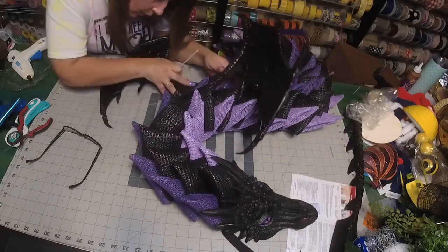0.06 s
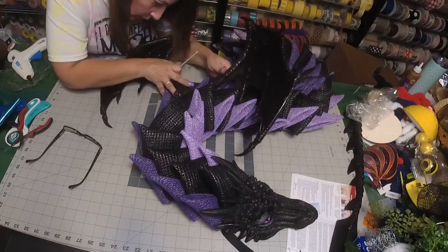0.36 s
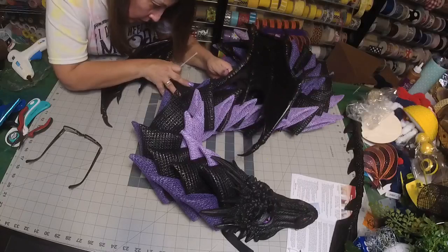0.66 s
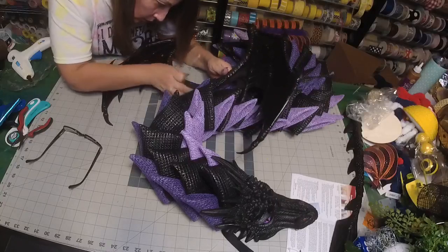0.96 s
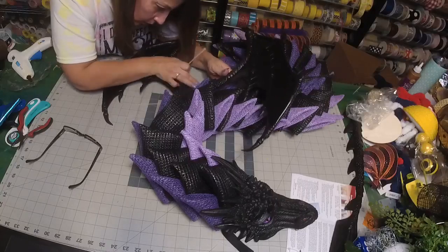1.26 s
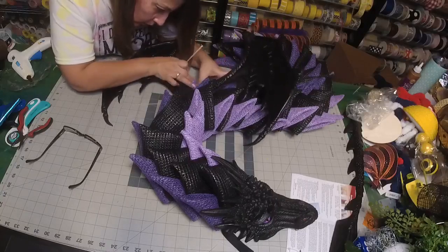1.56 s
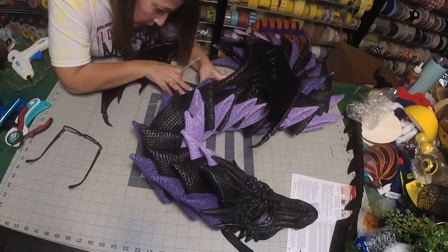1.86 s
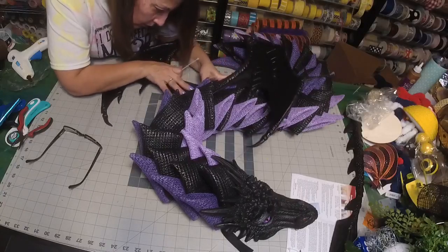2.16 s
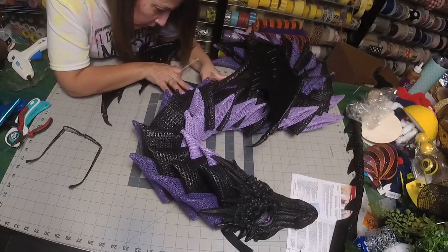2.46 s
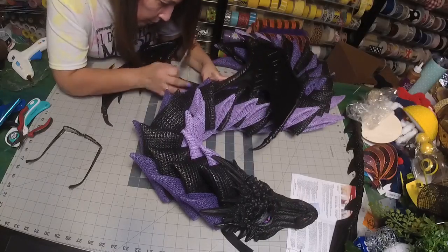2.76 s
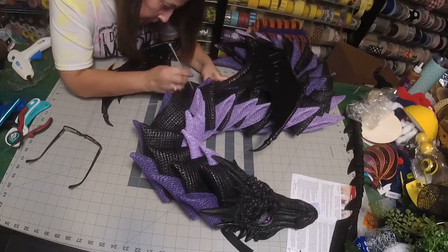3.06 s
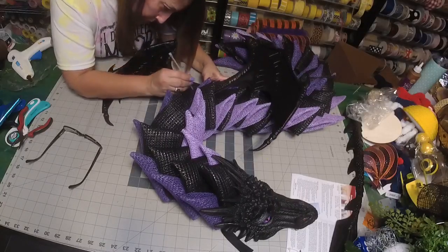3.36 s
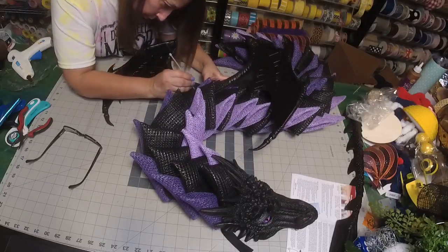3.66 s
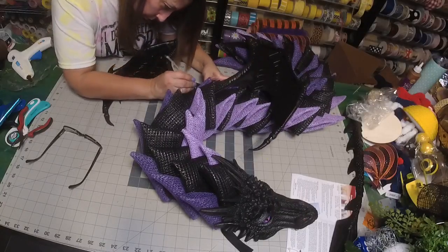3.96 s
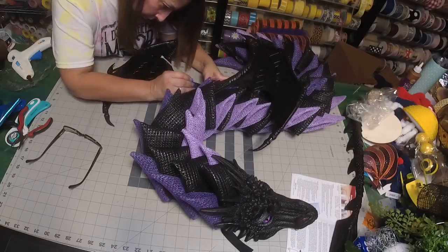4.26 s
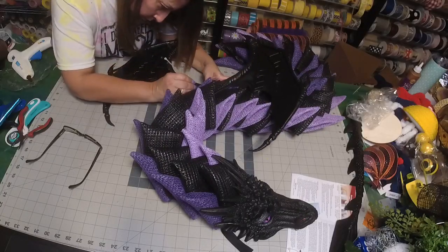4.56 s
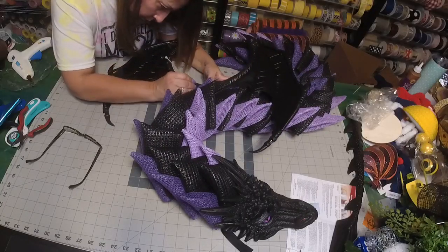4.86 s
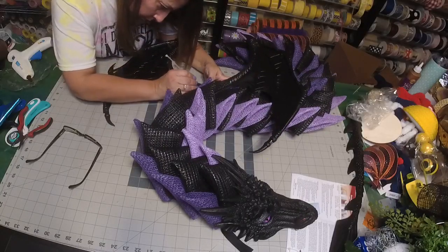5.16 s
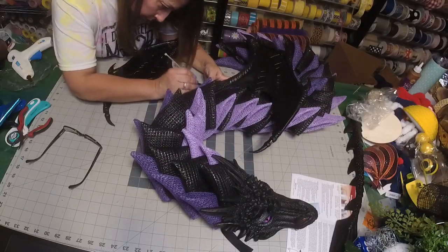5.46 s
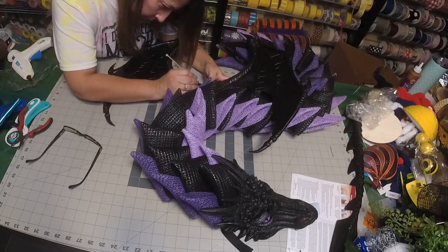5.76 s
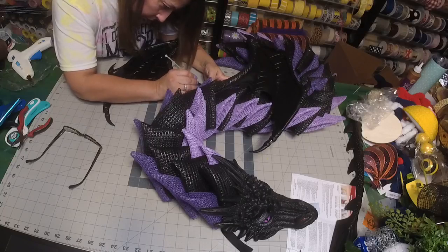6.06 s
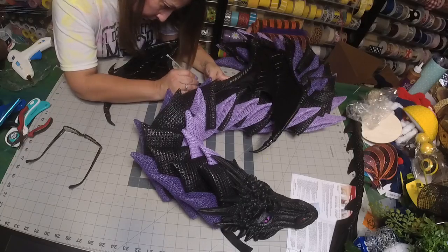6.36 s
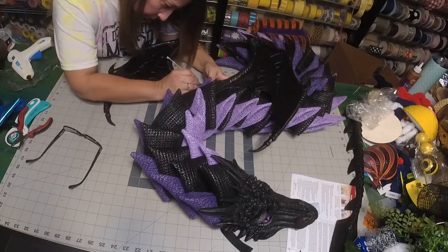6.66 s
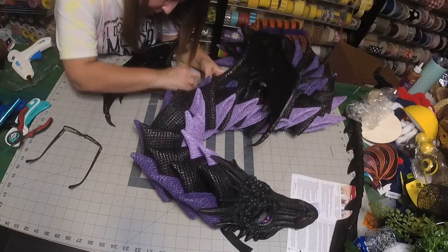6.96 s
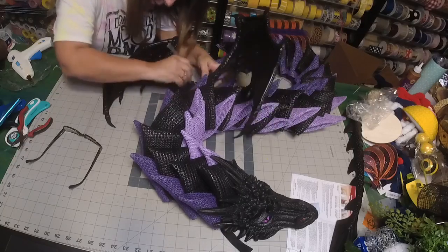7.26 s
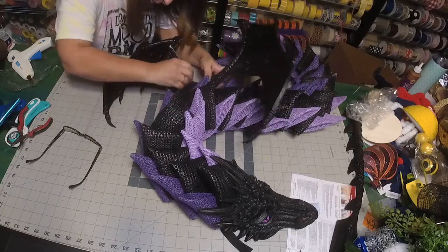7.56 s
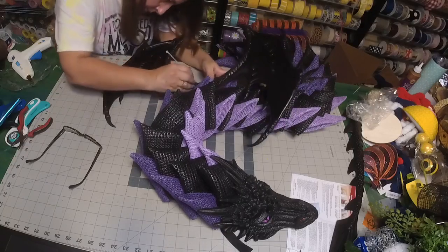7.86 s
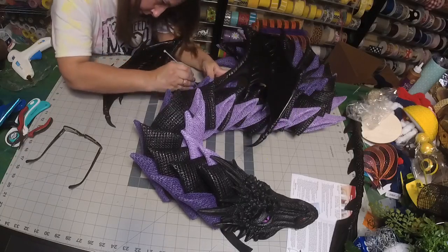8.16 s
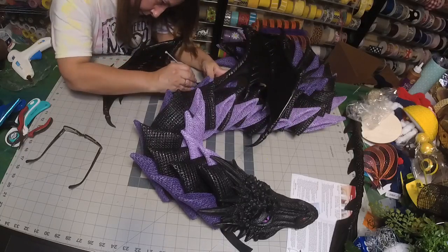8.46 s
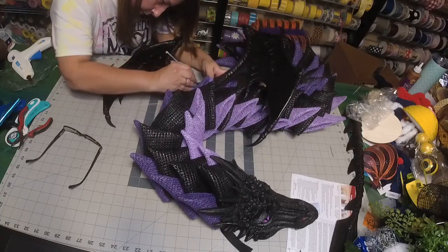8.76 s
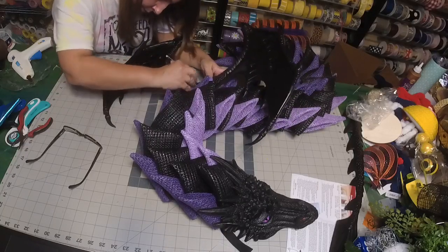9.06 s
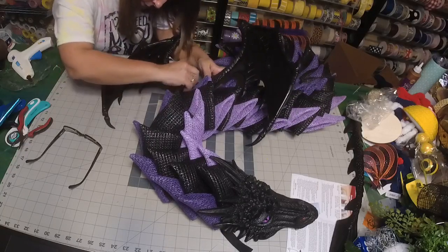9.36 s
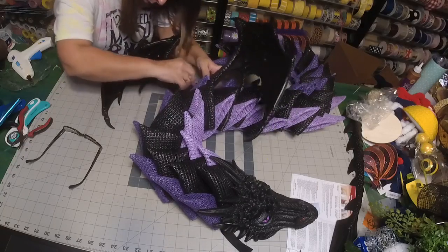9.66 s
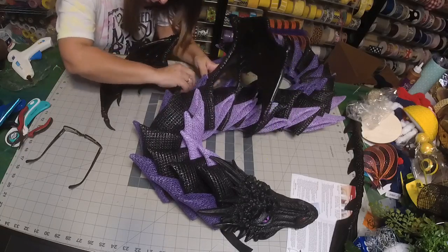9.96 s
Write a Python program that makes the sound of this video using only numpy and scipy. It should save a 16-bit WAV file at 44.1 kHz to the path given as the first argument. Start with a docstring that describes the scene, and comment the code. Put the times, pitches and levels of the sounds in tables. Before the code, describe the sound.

Close to the microphone and slightly to the right, hands work stiff plastic mesh at a table in a small room. The mesh rustles and ticks softly, the piece bumps dully, and a hand tool gives sharp, hollow clicks and a few tiny scrapes. The work is busy at first, thins in the middle, then picks up. A bright, sputtering hiss and low rumble run throughout, with a faint distant engine coming and going.

```python
"""Hands work stiff plastic mesh on a wreath frame, at a craft table in a small room, close to the
camera's microphones and a little to the right. The mesh rustles and ticks, a hand tool clicks and scrapes,
the piece bumps softly and sways the table. Far outside, an engine comes and goes over the room's rumble.
The camera's electronics sputter into its microphones as a bright hiss that swells every two seconds."""
import sys
import numpy as np
from scipy import signal
from scipy.fft import rfft, irfft
from scipy.io import wavfile
from scipy.ndimage import uniform_filter1d

SR = 44100
rng = np.random.default_rng(int(sys.argv[2]) if len(sys.argv) > 2 else 0)


def transcribe(signal):
    """Save signal, clipped to [-1, 1], as a 16-bit WAV file at the path in sys.argv[1]."""
    frames = np.atleast_2d(signal).T
    limited = np.clip(frames, -1, 1)
    pcm = np.round(limited * 32767).astype(np.int16)
    wavfile.write(sys.argv[1], SR, pcm)


N = 441000
T = np.arange(N) / SR

# strokes of the hands over the mesh: middle t/s, length/s, relative level/dB
HAND_STROKES = [(.13, 0.24, -65), (.55, 0.3, -63), (.84, 0.068, -64), (1.17, 0.22, -59),
                (1.35, 0.24, -67.5), (1.72, 0.16, -56.5), (1.82, 0.18, -56.5), (2, .2, -63),
                (2.16, 0.089, -66), (2.35, 0.14, -65), (2.85, 0.59, -64), (3.98, 0.21, -64),
                (5.8, 0.19, -69), (6.27, 0.42, -62.5), (6.85, 1, -63.5), (7.33, 0.12, -64),
                (7.51, 0.12, -63), (7.8, 0.8, -67), (8.6, 0.88, -67), (9.4, 0.82, -61), (9.9, 0.75, -64)]
# colour of rubbed mesh: f/Hz, level/dB
MESH_COLOUR = [(100, -2.5), (300, 12.5), (500, 5.5), (1000, 0.5), (1700, 1.5), (3500, -8), (6000, -20.5),
               (11000, -12), (15000, -40)]
# the engine from indoors, one table each time it is heard: t/s, f/Hz, level/dB
ENGINE_SPELLS = [
    [(0, 135.3, -59.5), (.6, 139, -61.5), (.95, 140.7, -57.5)],
    [(1.2, 146, -71), (1.4, 149, -57.5), (1.65, 144, -57.5)],
    [(4.78, 145.5, -58.5), (4.95, 126.5, -57), (5.05, 115.7, -52.5), (5.3, 117, -64)],
    [(5.85, 113, -53.5), (6.15, 116, -52), (6.45, 122.7, -53.5), (6.77, 124.8, -45.5), (6.95, 124.1, -48.5),
     (7.25, 126.2, -53.5)],
    [(8.8, 117.9, -53.5), (9.1, 112.4, -58.5), (9.5, 113.7, -51.5), (10, 118, -52)],
]
# colours of the room's rumble and of the microphone hiss: f/Hz, level/dB
RUMBLE_COLOUR = [(20, 1), (30, -7), (45, -6), (65, -9), (100, -14), (150, -24.5), (220, -30), (400, -31.5),
                 (700, -34.5), (1300, -38.5), (2000, -45), (3000, -54)]
HISS_COLOUR = [(300, 4), (1500, -60), (3200, 4), (4500, -7), (6300, 4), (7800, 9), (9000, -2.5),
               (10500, 12), (12500, -10), (14000, -34), (15600, -27)]
# the camera's frame, sensor, processor and buffer clocks: f/Hz, busy from/cycles, busy for/cycles
CAMERA_CLOCKS = [(29.97, .45, .5), (32.276, .99, .5), (62.246, .74, .38), (23.4375, .83, .12)]
# the camera writes to memory: middle t/s, added spike rate/Hz
MEMORY_WRITES = [(1.89, 950), (3.892, 743), (5.895, 1314), (7.89, 1100), (9.9, 910)]
# a spike smears into a chirp of about a millisecond: centre f/Hz, half width/Hz, delay to either side/s
SPIKE_SMEAR = (8600, 800, .0004)
# lead of the left microphone in the sputter: f/Hz, phase/rad
SPUTTER_LEAD = [(3000, -2.5), (5500, -.3), (6700, -3), (7250, 1.2), (7700, .3), (8400, -.1), (9400, .7),
                (10300, -2.3), (13400, -3), (14600, 0)]
# colour of the sputter: f/Hz, left level/dB, right level/dB
SPUTTER_COLOUR = [(1500, -45, -45), (3250, -24, -20), (4200, -29, -30), (5700, -21.5, -14.5),
                  (6600, -13.5, -12.5), (7400, -15, -13), (8000, -4, -4), (8750, 0, 0), (9250, -1, -7),
                  (9750, -13, -16), (10500, -6, -18), (12300, -21, -26), (14200, -31, -33),
                  (15600, -26, -28)]
# single strands flick free: t/s, starting level/dB, tilt/(dB per octave)
STRAND_FLICKS = [(.061, -54, 6), (.134, -55, 6.5), (.263, -51, 6), (.813, -55, 7), (.83, -56, -9),
                 (1.247, -54, 0), (1.284, -51, 7), (1.559, -54, 7), (1.643, -55, -2), (1.74, -55, 9),
                 (1.971, -57, -3), (2.022, -52, -7), (2.385, -57, -5), (3.162, -47, 12), (4.047, -59, -8),
                 (4.462, -55, 10.5), (4.842, -57, -2), (5.362, -53, 10), (5.799, -55, 13), (5.842, -58, -4),
                 (6.242, -49, -3), (6.301, -54, 3), (6.402, -57, -10), (6.832, -51, 4), (6.926, -53, 5),
                 (6.993, -54, -2), (7.065, -53, 9), (7.131, -55, 9), (7.154, -49, 9), (7.187, -55, -1),
                 (9.115, -59, -6), (9.205, -61, -3), (9.325, -55, -4), (9.631, -61, -5)]
# colour of a plucked strand: f/Hz, level/dB
STRAND_COLOUR = [(400, -18), (1000, 4.5), (1400, 8), (1900, 3.5), (2700, -6), (3600, -1.5), (5000, -7),
                 (12000, -27)]
# tool and mesh snap on the frame:
# t/s, knock peak/dB, knock f/Hz, knock swell/cycles, relative snap peak/dB, snap tilt/(dB per octave)
TOOL_CLICKS = [(0.097, -42, 1050, 0.21, -39, 0.5), (0.531, -65, 1370, 0.46, -47.5, -4),
               (1.079, -37, 1500, 0.4, -40, 6), (1.664, -39, 899, 0.26, -57, -7),
               (1.7108, -41, 970, 1.3, -31.5, 0), (1.72, -40, 960, 0.81, -41, -1),
               (1.804, -37.5, 800, 0.22, -46, -6), (2.217, -39.5, 1250, 0.51, -39.5, -6.5),
               (2.628, -48, 1326, 0.37, -48, -8.5), (2.782, -31.5, 1091, 0.44, -40, -11),
               (2.884, -45, 1500, 0.24, -41, 3.5), (4.644, -46, 1510, 0.4, -44, -3),
               (6.1, -43.5, 1060, 0.25, -43, 4), (6.701, -33, 1090, 0.65, -46, -5),
               (7.311, -47, 1610, 0.72, -44.5, -4), (7.483, -45, 1168, 0.41, -48, -2),
               (7.683, -47, 1170, .5, -46.5, 1), (7.772, -45.5, 1109, 0.77, -43, 8),
               (8.738, -38.5, 1190, .35, -60, -2), (8.839, -34, 1226, 0.97, -42, 4),
               (9.147, -33.5, 1130, 0.64, -47, -4), (9.541, -41, 1240, 0.44, -47, -8),
               (9.654, -46.5, 1603, 0.43, -50, -7)]
# modes of the wreath frame: f/Hz, relative level/dB, t60/s
FRAME_MODES = [(504, 5.5, 0.15), (644, 6.5, 0.08), (827, -0.5, 0.089), (982, -4.5, 0.057),
               (1307, -4, 0.088), (1550, 2, 0.072), (2060, -4, 0.13)]
# colour of a plastic snap: f/Hz, level/dB
SNAP_COLOUR = [(300, -2), (1000, -6), (1900, 17), (3300, 13.5), (5000, 10.5), (7000, 15.5), (10500, 10),
               (15000, -7)]
# hands bump the padded piece: t/s, relative level/dB, f/Hz
HAND_BUMPS = [(0.315, -46, 210), (0.438, -46.5, 297), (0.61, -47, 286), (1.04, -44.5, 210),
              (1.676, -47.5, 320), (1.717, -48, 430), (1.783, -45, 238), (1.822, -42.5, 235),
              (1.88, -46, 258), (1.994, -47.5, 248), (2.194, -41.5, 273), (2.228, -43, 300.8),
              (2.328, -47, 295), (2.729, -49, 240), (2.844, -48, 211), (2.869, -47.5, 220),
              (2.934, -47, 230), (3.006, -48, 229), (3.04, -49, 220), (3.067, -42.5, 180),
              (3.505, -49.5, 218), (3.691, -41.5, 194.5), (4.123, -40, 186), (4.155, -43, 194),
              (4.634, -52, 230), (4.838, -51, 185), (5.011, -41, 186.8), (5.667, -47, 229.8),
              (5.789, -43.5, 199.8), (6.097, -50, 249.2), (6.253, -42.5, 254.1), (6.442, -48, 200),
              (6.705, -45, 279.7), (6.932, -41, 215), (6.963, -45, 253), (7.152, -47, 245),
              (7.625, -39.5, 181.2), (8.003, -45, 267), (8.024, -46, 396), (8.227, -41, 187),
              (8.844, -44, 198), (8.871, -43.5, 210), (9.023, -42, 200), (9.031, -44.5, 260),
              (9.075, -41.5, 188), (9.122, -52, 232), (9.321, -45, 270), (9.544, -47, 230),
              (9.666, -43.5, 214.5), (9.749, -45.5, 230), (9.864, -46.5, 230)]
# shoves that sway the table top: t/s, level/dB, f/Hz, swell/cycles
TABLE_JOLTS = [(1.11, -42, 41.8, 2.5), (1.77, -40, 38, 2), (2.07, -43, 37, 1.36)]
# the tool drags across the strands: middle t/s, length/s, level/dB, tilt/(dB per octave)
TOOL_SCRAPES = [(1.673, 0.054, -69, 4), (1.731, 0.055, -63, 2), (6.26, 0.15, -64, -7),
                (6.533, 0.091, -59, 0), (7.152, 0.076, -59, -2), (8.829, 0.021, -56.5, 0)]
# narrow dips in the microphones' response: f/Hz, width/Hz, depth/dB
MIC_DIPS = [(2357, 153, 16.5), (4797, 145, 13.5), (5223, 94, 21.5), (7127, 251, 17), (14400, 71, 35)]
# direct-current offset of the converter: left/full scale, right/full scale
DC_OFFSET = [-.136, -.1]


def undb(db):
    """Decibels to gain."""
    return 10 ** (np.asarray(db) / 20)


def level(x, db):
    """Scale to an rms level."""
    return x * undb(db) / np.sqrt(np.mean(x ** 2))


def colour(x, points):
    """Filter by (Hz, dB) points joined on a log-frequency axis."""
    hz, db = np.transpose(points)
    f = np.maximum(np.fft.rfftfreq(x.shape[-1], 1 / SR), 1)
    return irfft(rfft(x) * undb(np.interp(np.log(f), np.log(hz), db)), x.shape[-1])


def tilted(points, db_per_octave):
    """Make a colour brighter or duller."""
    return [(hz, db + db_per_octave * np.log2(hz / points[0][0])) for hz, db in points]


def walk(rate_hz):
    """Glide between random values, rate_hz of them a second; spread near 1."""
    hold = int(SR / rate_hz)
    return uniform_filter1d(np.repeat(rng.standard_normal(N // hold + 1), hold), hold)[:N]


def add(track, at_s, sound):
    """Mix a sound into a track at a time."""
    i = max(int(at_s * SR), 0)
    track[i:i + len(sound)] += sound[:N - i]


def contact(t, hz, cycles):
    """A heavily damped contact: its envelope swells to 1 in the given cycles, then dies."""
    age = t * hz / cycles
    return np.sin(2 * np.pi * hz * t) * age * np.exp(1 - age)


def swells(moves):
    """Each move of the hand gathers speed and slows in one smooth arch; overlaps add in power."""
    arches = (undb(db) * np.cos(np.pi * np.clip((T - s) / length, -.5, .5)) for s, length, db in moves)
    return np.sqrt(sum(arch ** 2 for arch in arches))


def mesh_rustle(slips_per_s=300, spread_db=2, resting_db=-77, grip_db=2.5):
    """Strands slip over each other in tiny ticks of uneven size; the same motion shakes the table."""
    slips = (rng.random(N) < slips_per_s / SR) * rng.choice([-1, 1], N)
    sizes = undb(spread_db * np.minimum(rng.exponential(size=N), 4))
    ticks = colour(slips * sizes, MESH_COLOUR)
    shake = colour(rng.standard_normal(N), [(15, -40), (35, -12.5), (70, -13), (140, -20.5), (500, -59)])
    motion = np.hypot(swells(HAND_STROKES), undb(resting_db))  # the mesh never lies quite still
    grip = undb(grip_db * walk(14))
    return motion * grip * (level(ticks, db=-1) + level(shake, db=7))


def far_engine(waver_db=1, fade_s=.038):
    """An engine far outside: only its firing tone gets through the walls."""
    out = np.zeros(N)
    for spell in ENGINE_SPELLS:
        s, hz, db = np.transpose(spell)
        fade = np.clip(np.minimum(T - s[0], s[-1] - T) / fade_s, 0, 1)
        tone = np.sqrt(2) * np.sin(2 * np.pi * np.cumsum(np.interp(T, s, hz)) / SR)
        out += tone * fade * undb(np.interp(T, s, db) + waver_db * walk(17))
    return out


def room_tone(rumble_db=-43.5, unsteady_db=1.4, mains_hz=60, hum_db=-58.5):
    """The room rumbles, its bass alike at both microphones, with a faint mains hum."""
    mid, side = rng.standard_normal((2, N))
    side = colour(side, [(60, -12), (140, -9), (300, -2), (2000, -5)])
    rumble = level(colour(np.array([mid + side, mid - side]), RUMBLE_COLOUR), rumble_db)
    hum = level(np.sin(2 * np.pi * mains_hz * T), hum_db)
    return rumble * undb(unsteady_db * walk(9)) + hum


def microphone_hiss(db=-56.5):
    """Each microphone has its own smooth, steady hiss."""
    return level(colour(rng.standard_normal((2, N)), HISS_COLOUR), db)


def spike_rate(idle_per_s=430, frame_per_s=420, sensor_per_s=680, buffer_per_s=540, write_s=.047):
    """Current spikes crowd where clocks are busy at once, memory is written or hands move in view."""
    frame, sensor, processor, buffer = ((T * hz - start) % 1 < busy for hz, start, busy in CAMERA_CLOCKS)
    processing = processor * (frame_per_s * frame + sensor_per_s * sensor)
    clocked = idle_per_s + processing + buffer_per_s * buffer
    writing = sum(per_s * np.exp(-((T - s) / write_s) ** 2 / 2) for s, per_s in MEMORY_WRITES)
    motion = 1 + .2 * np.tanh(swells(HAND_STROKES) / undb(-62))
    uneven_load = undb(1.8 * walk(90) + .5 * walk(16))
    return clocked * uneven_load * motion + writing


def camera_sputter(scatter_db=2.6, load_power=.34, db=-46.5):
    """Spikes inside the camera leak into both microphones as tiny chirps, coloured and phased apart."""
    due = np.cumsum(rng.gamma(2, 1 / 2, N // 10))  # uneven gaps around the mean rate
    rate = spike_rate()
    count = np.cumsum(rate) / SR
    at = np.searchsorted(count, due[due < count[-1]])
    spikes = np.zeros(N)
    spikes[at] = (rng.choice([-1, 1], N) * undb(scatter_db * rng.standard_normal(N)))[at]
    spikes *= rate ** load_power  # a busier circuit draws larger spikes
    f = np.fft.rfftfreq(N, 1 / SR)
    centre, width, delay = SPIKE_SMEAR
    lag = 2 * np.pi * np.cumsum(delay * np.tanh((f - centre) / width)) * SR / N
    lead = np.interp(f, *np.transpose(SPUTTER_LEAD)) / 2 * np.array([[1], [-1]])
    chirps = irfft(rfft(spikes) * np.exp(1j * (lead - lag)), N)
    hz, *sides_db = np.transpose(SPUTTER_COLOUR)
    channels = [colour(x, np.transpose([hz, side])) for x, side in zip(chirps, sides_db)]
    return level(np.array(channels), db)


def strand_flicks(decay_s=.0036):
    """A caught strand flicks free with one small dry tick, too light to ring the frame."""
    out, t = np.zeros(N), T[:SR // 16]
    for s, db, tilt in STRAND_FLICKS:
        tick = level(colour(rng.standard_normal(len(t)), tilted(STRAND_COLOUR, tilt)), db)
        add(out, s, tick * np.exp(-t / decay_s))
    return out


def tool_clicks(ring_db=-11, snap_gain_db=2, snap_decay_s=.0042):
    """Each click is a bright snap of plastic and a short hollow knock that rings the frame."""
    out, t = np.zeros(N), T[:SR // 4]
    for s, knock_db, knock_hz, cycles, snap_db, tilt in TOOL_CLICKS:
        ring = 0
        for hz, mode_db, t60 in FRAME_MODES:
            detuned_hz = hz * (1 + .012 * rng.standard_normal())
            mode = np.sin(2 * np.pi * detuned_hz * t) * np.exp(-np.log(1000) * t / t60)
            # a longer knock stirs only modes near its pitch
            reach = 1 / (1 + (2 * np.pi * cycles * (hz / knock_hz - 1)) ** 2)
            ring += reach * undb(mode_db) * mode
        knock = contact(t, knock_hz, cycles) + undb(ring_db) * ring
        snap = colour(rng.standard_normal(len(t)), tilted(SNAP_COLOUR, tilt)) * np.exp(-t / snap_decay_s)
        add(out, s, undb(knock_db) * knock / abs(knock).max())
        add(out, s, undb(snap_db + snap_gain_db) * snap / abs(snap).max())
    return out


def hand_bumps(cycles=.59, gain_db=-1.8, scuff_s=.011, nudges=36, nudge_db=-58, nudge_hz=215):
    """Hands meet the padded piece with a low bump and a dull scuff; fingers nudge it in between."""
    out, t = np.zeros(N), T[:SR // 8]
    for when, size, pitch in rng.random((nudges, 3)):
        nudge = contact(t, nudge_hz * 2 ** (pitch - .5), cycles)
        add(out, when * N / SR, undb(nudge_db + 2 * size) * nudge)
    for s, db, hz in HAND_BUMPS:
        dull_noise = colour(rng.standard_normal(len(t)), [(hz / 2, -10), (hz, 0), (hz * 10, -45)])
        scuff = level(dull_noise, db=-18) * np.exp(-t / scuff_s)
        add(out, s, undb(db + gain_db) * (contact(t, hz, cycles) + scuff))
    return out


def table_jolts():
    """The table top takes each shove with a few slow, dying swings."""
    out = np.zeros(N)
    for s, db, hz, cycles in TABLE_JOLTS:
        add(out, s, undb(db) * contact(T[:SR // 2], hz, cycles))
    return out


def tool_scrapes(strands_per_s=420, spread_db=4):
    """The tip of the tool plucks strand after strand in a short, uneven rasp."""
    catches = (rng.random(N) < strands_per_s / SR) * rng.choice([-1, 1], N)
    plucks = catches * undb(spread_db * np.clip(rng.standard_normal(N), -2, 2))
    out = np.zeros(N)
    for s, length, db, tilt in TOOL_SCRAPES:
        span = slice(int(s * SR) - SR // 4, int(s * SR) + SR // 4)
        rasp = level(colour(plucks[span], tilted(STRAND_COLOUR, tilt)), db=0)
        out[span] += rasp * swells([(s, length, db)])[span]
    return out


def small_room(direct, t60_s=.18, wet_db=-7, echo_s=.0054, echo_db=-9):
    """Direct sound, an echo off the nearest surface, and a short diffuse tail unlike at each microphone."""
    t = T[:SR // 2]
    tail = rng.standard_normal((2, len(t))) * np.exp(-np.log(1000) * t / t60_s) * (t > .003)
    tail = colour(tail, [(60, -18), (200, -3), (400, 0), (3000, 0), (12000, -4)])
    tail *= undb(wet_db) / np.sqrt(np.sum(tail ** 2) / 2)
    tail[:, int(echo_s * SR)] += undb(echo_db)
    return direct + signal.fftconvolve(direct[None], tail, axes=1)[:, :N]


def scene(right_over_left_db=2):
    """Handwork close by, a little to the right, over the far engine, room tone and the camera's noise."""
    hands = tool_clicks() + strand_flicks() + hand_bumps() + mesh_rustle() + tool_scrapes() + table_jolts()
    pan = undb(np.array([[-.5], [.5]]) * right_over_left_db)
    return small_room(hands) * pan + far_engine() + room_tone() + microphone_hiss() + camera_sputter()


def record(dry, top_hz=15750):
    """The camera's microphones have a few narrow dips, the top is cut, and the converter rests off zero."""
    f = np.fft.rfftfreq(N, 1 / SR)
    dips_db = sum(depth * np.exp(-((f - hz) / width) ** 2 / 2) for hz, width, depth in MIC_DIPS)
    heard = irfft(rfft(dry) * undb(-dips_db), N)
    lowpass = signal.ellip(10, .2, 70, top_hz, fs=SR, output="sos")
    return signal.sosfilt(lowpass, heard) + np.array(DC_OFFSET)[:, None]


dry = scene()
out = record(dry)
transcribe(out)
```